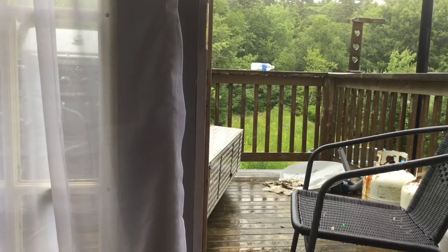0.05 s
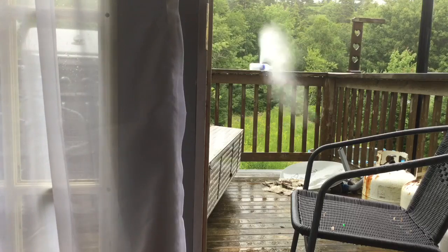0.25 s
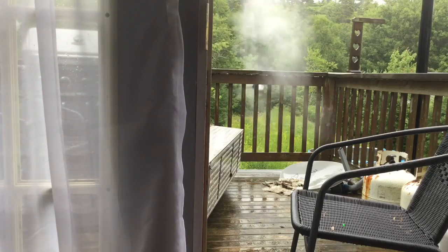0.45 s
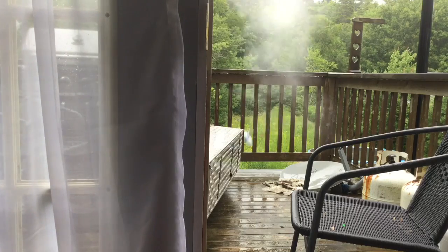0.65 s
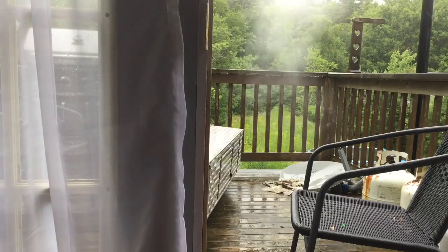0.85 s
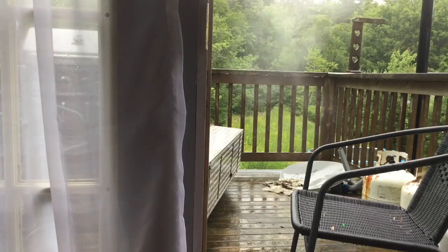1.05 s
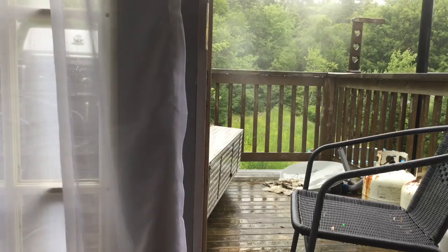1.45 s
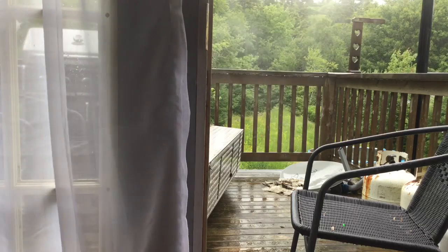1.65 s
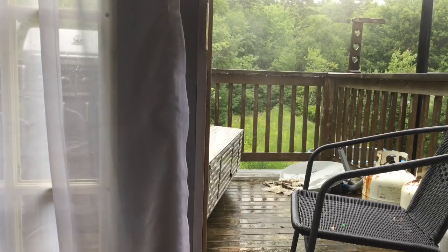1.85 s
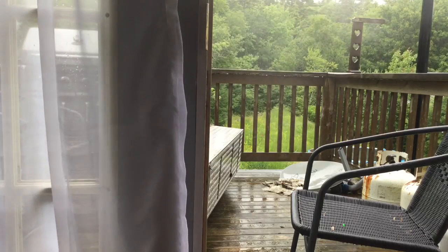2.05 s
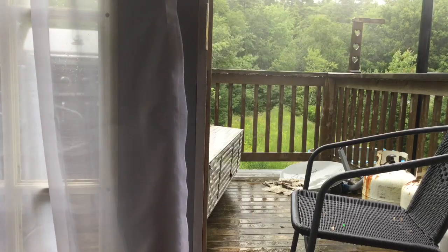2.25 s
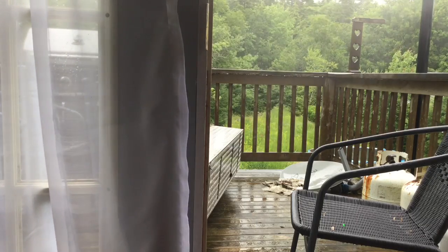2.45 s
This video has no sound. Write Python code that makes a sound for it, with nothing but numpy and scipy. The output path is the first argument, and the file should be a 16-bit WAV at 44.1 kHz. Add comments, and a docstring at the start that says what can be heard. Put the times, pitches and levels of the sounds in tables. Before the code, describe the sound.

A pressurized plastic bottle bursts with a loud pop and a short rush of gas.

```python
"""Wind buffets the microphone over a quiet garden; then a pressurised plastic bottle splits and bursts.
It is on a deck rail, a few metres from a phone in a doorway. Cracks of the tearing wall and thumps of
escaping air overload the microphone. The turbulent gas jet roars, swells again as the bottle tumbles,
and runs out. A thin hiss follows a second after the burst, with soft knocks; last come faint ticks
and one bird call."""
import sys
import numpy as np
from scipy import signal
from scipy.fft import rfft, irfft
from scipy.io import wavfile

SR = 44100
rng = np.random.default_rng(int(sys.argv[2]) if len(sys.argv) > 2 else 0)


def materialize(psi):
    """Save the field psi as 16-bit PCM at rate SR to the path in sys.argv[1].

    A 1-D psi becomes a single channel; in a 2-D psi each row is a channel.
    """
    bounded = np.clip(np.atleast_2d(psi).T, -1, 1)
    quanta = np.round(bounded * 32767).astype(np.int16)
    wavfile.write(sys.argv[1], SR, quanta)


N = 110250
T = np.arange(N) / SR


def undb(db):
    """Amplitude ratio of a level in decibels."""
    return 10 ** (np.asarray(db) / 20)


def envelope(rows):
    """Gain interpolated between (s, dB) points, silent outside them."""
    return undb(np.interp(T, *np.array(rows).T, left=-150, right=-150))


def shaped(gain):
    """Spectral shaping: white noise weighted by gain(Hz), scaled to rms 1."""
    hz = np.arange(N // 2 + 1) * SR / N + 1
    x = irfft(rfft(rng.standard_normal(N)) * gain(hz), N)
    return x / x.std()


def noise(spectrum):
    """Coloured noise of rms 1, shaped by (Hz, dB) points."""
    hz, db = np.array(spectrum).T
    return shaped(lambda f: undb(np.interp(np.log(f), np.log(hz), db)))


def flutter(hz):
    """Random modulation of rms 1, low-passed at hz."""
    return shaped(lambda f: 1 / (1 + (f / hz) ** 4))


def bursts(rows, spectrum):
    """Noise transients with sudden onset and exponential decay."""
    gain = sum(undb(db) * (T >= start) * np.exp(-abs(T - start) / decay) for start, db, decay in rows)
    return noise(spectrum) * gain


def resonances(rows):
    """Resonance driven by flow: bands of noise, each under a Gaussian swell."""
    out = 0
    for centre, spread, hz, width, db in rows:
        swell = undb(db) * np.exp(-.5 * ((T - centre) / spread) ** 2)
        out += swell * shaped(lambda f: 1 / (1 + (2 * (f - hz) / width) ** 2))
    return out


# Each row: frequency in Hz, relative level in dB.
GARDEN_SPECTRUM = [(60, -4.5), (150, -3), (300, -2.5), (480, -11.5), (750, -11), (1250, -9.5),
                   (2200, -14.5), (3200, -19.5), (6000, -25), (15000, -35.5)]

def garden(level_db=-62.5, drift_db=1.0):
    """Ambient noise: a quiet floor whose level wavers slightly."""
    return noise(GARDEN_SPECTRUM) * undb(level_db + drift_db * flutter(6.9))


# Each row: time in seconds, pitch in Hz, level in dB.
BIRD_CALL = [(2.322, 3335, -77), (2.351, 3400, -66), (2.369, 3440, -67), (2.402, 3344, -74),
             (2.418, 3290, -68), (2.452, 3290, -62), (2.465, 3240, -64.5), (2.485, 3257, -64.5),
             (2.5, 3260, -69.5)]

def bird(pitch_waver=.02, roughness_db=2.8, octave_db=-14):
    """A faint whistle and its octave, roughened by frequency and amplitude modulation."""
    times, hz, db = np.array(BIRD_CALL).T
    pitch = np.interp(T, times, hz) * (1 + pitch_waver * flutter(299))
    phase = 2 * np.pi * np.cumsum(pitch) / SR
    gain = envelope(np.c_[times, db]) * undb(roughness_db * flutter(140))
    return gain * (np.sin(phase) + undb(octave_db) * np.sin(2 * phase))


# Soft knocks and faint, drop-like ticks. Each row: start in seconds, level in dB, decay in seconds.
KNOCKS = [(1.306, -56.5, 0.059), (2.322, -52, 0.019)]
TICKS = [(2.251, -67.5, .004), (2.264, -69.5, .005), (2.297, -63, .003), (2.32, -70, .003)]
# Their spectra. Each row: frequency in Hz, relative level in dB.
KNOCK_SPECTRUM = [(120, -6), (280, -6.5), (600, -17), (1500, -17), (4000, -39), (10000, -54)]
TICK_SPECTRUM = [(1500, -4), (6000, -2.5), (15000, -9)]

def taps():
    """Damped transients: the dull knocks die away more slowly than the bright ticks."""
    return bursts(KNOCKS, KNOCK_SPECTRUM) + bursts(TICKS, TICK_SPECTRUM)


# The rumble. Each row: time in seconds, level in dB.
WIND_LEVEL = [(0, -43), (.06, -26), (.13, -40.5), (.21, -36.5), (.27, -32), (.33, -26), (.39, -25.5),
              (.52, -25), (.6, -28), (.67, -31.5), (.73, -35), (.81, -52.5), (1.03, -49), (1.07, -72),
              (1.39, -67), (1.45, -55.5), (1.65, -54), (1.85, -74), (1.91, -39), (2.05, -50), (2.22, -72),
              (2.42, -57), (2.5, -37)]
# Each row: frequency in Hz, relative level in dB.
WIND_SPECTRUM = [(20, -19.5), (45, -2.5), (70, 4), (120, -2.5), (200, -14), (320, -27), (600, -50.5),
                 (2000, -77.5)]
# Single eddies. Each row: centre in seconds, peak before the low cut in dB, frequency in Hz.
BUFFETS = [(0.06, -42, 75), (.092, -24, 106), (.111, -18.5, 159), (.129, -28.5, 260), (0.158, -26, 70),
           (.43, -11, 173), (0.5035, -15, 190), (0.563, -9, 76), (0.5741, -9, 137), (.605, -14.5, 89),
           (0.6357, -20, 145), (.688, -16, 143), (0.7728, -32, 170.1), (.877, -41, 110),
           (1.194, -43.5, 100), (1.252, -39, 80), (1.535, -38, 84.4), (1.567, -37.5, 83.8),
           (1.659, -36.5, 82.6), (1.886, -34, 133), (1.935, -31.5, 160), (1.996, -37, 112),
           (2.029, -40, 129.4), (2.296, -48, 150)]

def wind(decay_cycles=.44, rounding_cycles=.08, low_cut_hz=43.3):
    """Turbulent pressure on the microphone: a rumble, and eddies that rebound through its low cut."""
    rumble = noise(WIND_SPECTRUM) * envelope(WIND_LEVEL)
    eddies = 0
    for centre, db, hz in BUFFETS:
        cycles = (T - centre) * hz
        from_peak = np.hypot(cycles, rounding_cycles) - rounding_cycles
        eddies += undb(db) * np.cos(2 * np.pi * cycles) * np.exp(-from_peak / decay_cycles)
    low_cut = signal.butter(2, low_cut_hz, "highpass", fs=SR, output="sos")
    return rumble + signal.sosfilt(low_cut, eddies)


# Each row: time in seconds, level in dB.
HISS_LEVEL = [(1.304, -86), (1.309, -54.5), (1.335, -55), (1.38, -48.5), (1.45, -51.5), (1.51, -49),
              (1.56, -52.5), (1.63, -63), (1.73, -65.5), (1.79, -82)]
# Each row: frequency in Hz, relative level in dB.
HISS_SPECTRUM = [(1000, -15), (2400, -19), (3400, -16), (4800, -15), (5600, -9.5), (6400, -5.5), (7600, -6),
                 (10000, -1.5), (12500, 2.5), (15000, -2)]
# Each row: centre and spread in seconds, frequency and bandwidth in Hz, level in dB.
WHISTLES = [(1.45, .042, 2370, 310, -67.5), (1.52, 0.041, 4820, 300, -76), (1.5, .05, 6150, 350, -69),
            (1.49, 0.063, 5800, 190, -69.5)]

def late_hiss():
    """Thin broadband noise in which narrow resonances whistle faintly."""
    return noise(HISS_SPECTRUM) * envelope(HISS_LEVEL) + resonances(WHISTLES)


# Each row: frequency in Hz, level relative to the jolt in dB, decay in seconds.
BOTTLE_MODES = [(269.6, 0.5, 0.009), (660, -6, .007), (1027, -15, .005), (1237, -4.5, 0.0055),
                (1491, -6.5, .007), (2660, -16.5, .005)]
# The first pop, then two soft knocks. Each row: start in seconds, level in dB.
JOLTS = [(0.244, -10), (1.3056, -51), (1.3406, -53.5)]

def bottle_ring():
    """Free vibration: each jolt sets the hollow bottle's modes ringing as damped sinusoids."""
    out = 0
    for start, db in JOLTS:
        age = np.maximum(T - start, 0)
        for hz, mode_db, decay in BOTTLE_MODES:
            out += undb(db + mode_db) * np.sin(2 * np.pi * hz * age) * np.exp(-age / decay)
    return out


# Each row: start in seconds, level in dB, decay in seconds.
CRACKS = [(.2312, -23.5, 0.0055), (.2432, -17.5, 0.0023), (.2448, -24, 0.0017), (.2475, -15.5, .002),
          (.2512, -15, .002), (.261, -21.5, .0015), (.3075, 8.5, 0.0019), (.3148, -7, 0.0028),
          (.344, -4.5, 0.0019)]
# Each row: frequency in Hz, relative level in dB.
CRACK_SPECTRUM = [(150, -6), (700, 2.5), (1500, -1), (3000, -11), (7000, -7.5), (15000, -14)]

def wall_cracks():
    """Fracture: each tear in the wall releases stress as a brief broadband burst."""
    return bursts(CRACKS, CRACK_SPECTRUM)


# Sharp snaps to deep thumps. Each row: start in seconds, level in dB, first pitch in Hz, decay in seconds.
THUMPS = [(.2432, -8.5, 1090, 0.00059), (0.2469, -7.5, 520, .0075), (.3073, 13, 2006, .0009),
          (0.3084, 12.5, 277.8, 0.0083), (0.3345, 2, 200, 0.0041), (0.3441, 5.5, 410.5, 0.008),
          (0.3441, 3.5, 1297, .0012), (.3398, 0, 1100, .0009)]

def air_thumps(rise_fraction=.14):
    """Sudden expansion: each slug of air sends out a damped pressure wave whose period grows with age."""
    out = 0
    for start, db, hz, decay in THUMPS:
        age = np.maximum(T - start, 0)
        cycles = np.log1p(hz * age)
        rise = 1 - np.exp(-age / (rise_fraction * decay))
        out -= undb(db) * np.sin(2 * np.pi * cycles) * rise * np.exp(-age / decay)
    return out


def off_rail(direct, delay_s=.00077, echo_db=-18.5):
    """Comb filtering: the direct sound interferes with its reflection from the wooden rail."""
    return direct + undb(echo_db) * np.interp(T - delay_s, T, direct)


# The first leak, the open jet and its low roar. Each row: time in seconds, level in dB.
LEAK_LEVEL = [(.208, -96.5), (.215, -58), (.229, -47), (.232, -17), (.239, -25), (.247, -17.5), (.256, -29),
              (.263, -27), (.267, -50)]
JET_LEVEL = [(.267, -45.5), (.281, -27.5), (.305, -18.5), (.328, -8.5), (.365, -10), (.40, -15.5),
             (.428, -22.5), (.455, -26.5), (.483, -19), (.53, -28.5), (.61, -38.5), (.69, -54.5),
             (.74, -71.5)]
ROAR_LEVEL = [(.228, -55.5), (.25, -32), (.267, -38.5), (.28, -25), (.305, -25), (.34, -17), (.37, -21.5),
              (.42, -38), (.47, -46.5), (.6, -42.5)]
# Each row: frequency in Hz, relative level in dB.
JET_SPECTRUM = [(290, -43.5), (500, -13.5), (674, -10.5), (949, -14), (1050, -4.5), (1240, -4),
                (1650, -8.5), (1770, -3.5), (2390, -5.5), (3050, -5.5), (3450, -8), (3900, -5),
                (5380, -6.5), (6500, -2.5), (7200, -5), (9120, -1.5), (13400, -1.5), (15000, -4)]
ROAR_SPECTRUM = [(100, -2.5), (280, 1.5), (480, -8.5), (750, -6), (1300, -10), (3000, -17), (8000, -34)]
# The bottle resonates as it tears and turns.
# Each row: centre and spread in seconds, frequency and bandwidth in Hz, level in dB.
BOTTLE_BANDS = [(0.2162, 0.0046, 1300, 360, -45), (.337, .017, 310, 90, -19.5), (.35, 0.025, 553, 50, -30),
                (.35, 0.028, 2600, 500, -28.5), (.33, .03, 6300, 350, -26.5),
                (.39, 0.045, 9270, 400, -29.5), (.37, .045, 13100, 490, -26.5),
                (.49, 0.035, 1765, 170, -37.5), (.49, .035, 2350, 250, -38.5), (.51, 0.044, 2910, 130, -42),
                (.48, .05, 6600, 900, -39), (.49, .05, 11800, 300, -38), (.63, 0.05497, 1600, 2480, -51)]

def gas_jet(flutter_db=1, flutter_hz=250):
    """Jet turbulence: a bright rush, a low roar while pressure is high, and the bottle's resonances."""
    rush = noise(JET_SPECTRUM) * (envelope(LEAK_LEVEL) + envelope(JET_LEVEL))
    roar = noise(ROAR_SPECTRUM) * envelope(ROAR_LEVEL) * undb(flutter_db * flutter(flutter_hz))
    return off_rail(rush) + roar + resonances(BOTTLE_BANDS)


def scene():
    """Superposition: the bottle and its surroundings add in one channel."""
    bottle = wall_cracks() + bottle_ring() + air_thumps() + gas_jet()
    return (bottle + late_hiss() + garden() + taps() + wind() + bird())[None]


def record(dry):
    """Overload and band limiting: the phone clips at full scale, then cuts the highest treble."""
    top_hz = 15250
    low_pass = signal.ellip(10, .2, 70, top_hz, fs=SR, output="sos")
    return signal.sosfilt(low_pass, np.clip(dry, -1, 1))


dry = scene()
out = record(dry)
materialize(out)
```